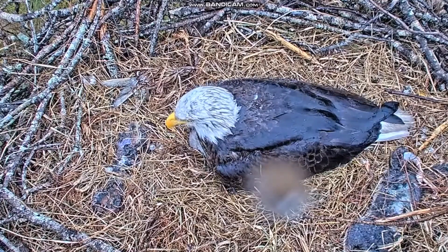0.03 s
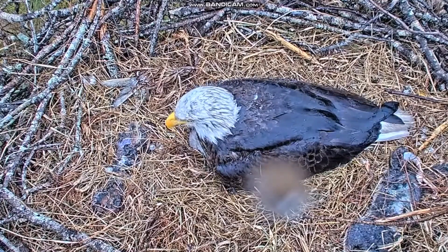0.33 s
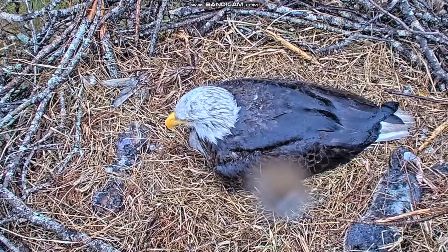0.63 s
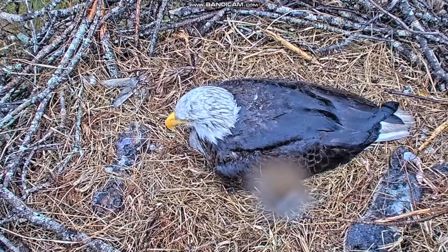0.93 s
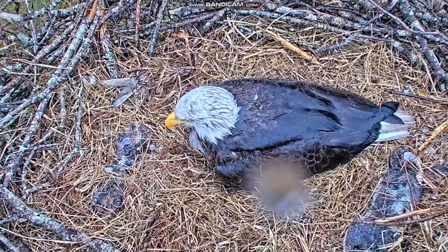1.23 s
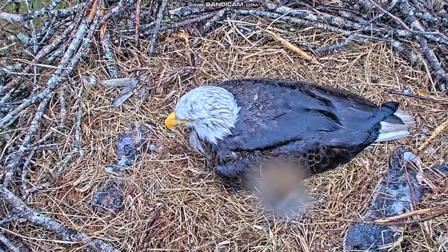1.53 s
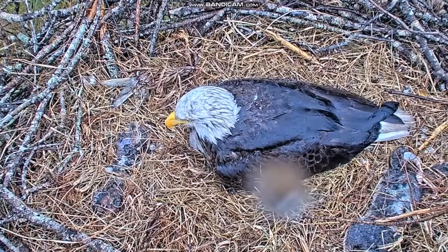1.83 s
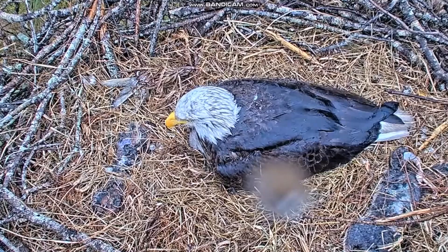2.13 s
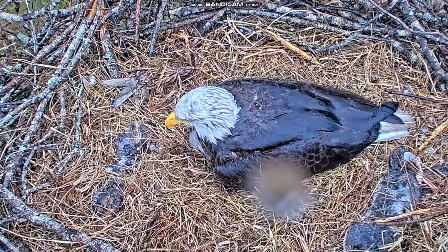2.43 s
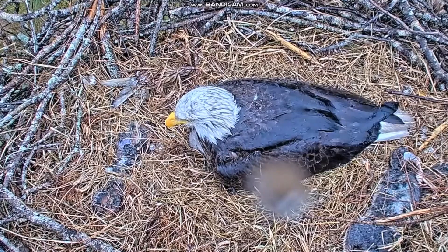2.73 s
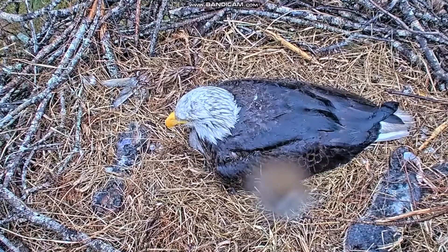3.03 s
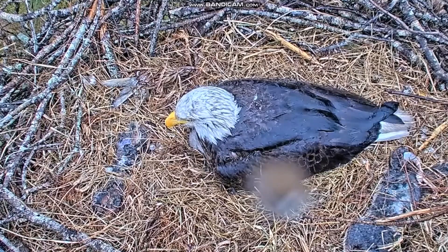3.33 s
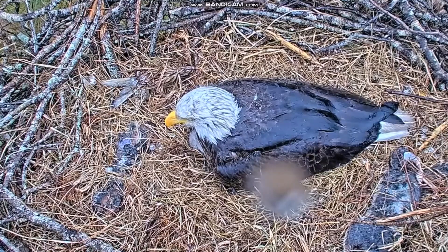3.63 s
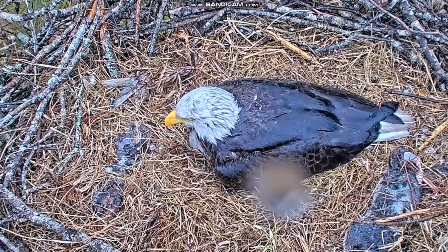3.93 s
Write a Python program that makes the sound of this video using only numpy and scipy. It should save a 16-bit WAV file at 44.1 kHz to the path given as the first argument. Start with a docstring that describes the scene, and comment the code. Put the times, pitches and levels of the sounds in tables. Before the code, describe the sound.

Light rain falls on a stick nest, with dull close taps and a few sharp ticks.

```python
"""At a big stick nest outdoors, light rain falls around a fixed camera.
Fine drops hiss in the straw and trees, over a low rumble and a faint drone. Heavier drops thud
dully on the camera's housing, a few tick sharply on twigs next to the microphone, and drips plink.
Puffs of wind push on the housing. The whole sound stutters once, very briefly."""
import sys
import numpy as np
from scipy import signal
from scipy.fft import rfft, irfft, next_fast_len
from scipy.io import wavfile
from scipy.ndimage import uniform_filter1d, map_coordinates

SR = 44100
rng = np.random.default_rng(int(sys.argv[2]) if len(sys.argv) > 2 else 0)


def output_pcm(signal):
    """Save a mono or channel-first signal as 16-bit PCM at the path in sys.argv[1].

    Samples are clipped to [-1, 1] before scaling.
    """
    pcm = np.clip(np.atleast_2d(signal).T, -1, 1) * 32767
    wavfile.write(sys.argv[1], SR, np.round(pcm).astype(np.int16))


N = 176400

# Levels are relative. A spectrum says how strong each frequency is; t60 is the time to fade by 60 dB.
# How loud the rain is over time: t/s, level/dB
RAIN_LOUDNESS = [(0.0, -47), (0.3, -46), (0.75, -48.5), (1.11, -49.5), (1.44, -47), (2.08, -49.5),
                 (2.32, -48), (2.91, -48), (3.53, -47), (4.0, -47)]
# Spectrum of the rain and its splashes: f/Hz, level/dB
RAIN_SPECTRUM = [(350, -35.5), (600, -22), (773, -16.5), (1070, -1.5), (1640, -0.5), (1970, -6),
                 (2040, -11), (2620, -8.5), (3880, -15), (4510, -15.5), (5240, -21.5), (5680, -28),
                 (7070, -30), (8210, -41.5), (9430, -35), (12300, -77), (20700, -120)]
# Narrow bands where the rain is louder: f/Hz, half width/Hz, boost/dB
RAIN_BOOSTS = [(1638, 200, 3), (2223, 94, 5.5), (2593, 86, 6.5), (2850, 22, 10.5), (3173, 11, 11.5),
               (3473, 36, 7)]
# How much the hiss shimmers: f/Hz, depth/dB
SHIMMER_DEPTH = [(500, 0), (1500, 2), (3000, 3.5), (8000, 5.5)]
# Spectrum of the rumble: f/Hz, level/dB
RUMBLE_SPECTRUM = [(20, 6), (40, -1), (75, -3), (105, -2.5), (140, 3), (210, 1.5), (280, -3.5), (400, -3.5),
                   (520, -14), (750, -21.5), (1200, -57.5)]
# Heavy drops on the housing: t/s, level/dB, base f/Hz, time before fading/s
HEAVY_DROPS = [(.107, -39, 222, 0.0062), (0.245, -28, 184, 0.0051), (0.356, -38, 192, 0.019),
               (0.526, -21, 210, 0.0067), (0.563, -29, 200, 0.011), (0.611, -38, 227, 0.0037),
               (0.71, -37, 189, 0.017), (0.813, -23.5, 215.3, 0.025), (0.901, -24.5, 204, 0.016),
               (0.942, -31.5, 221.6, 0.021), (1.017, -28.5, 209.3, 0.023), (1.066, -23, 166, 0.0039),
               (1.088, -30.5, 219.4, 0.024), (1.108, -19.5, 196, 0.0053), (1.136, -31.5, 183, 0.013),
               (1.15, -26.5, 190, 0.0052), (1.197, -36, 200, 0.034), (1.248, -23, 191, 0.0074),
               (1.332, -27.5, 203, 0.0044), (1.458, -33, 217, 0.011), (1.554, -28, 208, 0.0072),
               (1.624, -28, 175, 0.0064), (1.699, -31.5, 180.7, 0.025), (1.83, -31.5, 174, 0.011),
               (1.849, -27.5, 185, 0.015), (1.874, -24, 201, 0.013), (1.916, -22.5, 180, 0.0033),
               (1.937, -31.5, 203, 0.0092), (1.99, -27.5, 187.7, 0.025), (2.088, -25, 210, 0.0074),
               (2.106, -31.5, 198, 0.022), (2.2, -23, 193, 0.006), (2.243, -29, 203, 0.0097),
               (2.437, -31.5, 202, 0.0078), (2.539, -27, 219, 0.0076), (2.58, -28, 171, 0.012),
               (2.72, -26.5, 193.4, 0.019), (2.907, -27, 193.4, 0.015), (2.989, -27.5, 207, 0.0048),
               (3.12, -34.5, 208, 0.017), (3.14, -25, 213, 0.013), (3.377, -31.5, 184.3, 0.028),
               (3.428, -33.5, 215, 0.011), (3.649, -37, 185, 0.0075), (3.753, -23.5, 200, 0.0053),
               (3.874, -30, 225, 0.0081), (3.918, -33, 208, 0.02)]
# Tones the housing rings with: multiple of base f, level/dB, t60/s
HOUSING_TONES = [(0.679, -23.5, 0.047), (1.004, -1.5, 0.043), (1.299, -10.5, 0.028), (1.62, -13.5, 0.042),
                 (2.251, -17.5, 0.0091)]
# Drops on twigs: t/s, level/dB, treble tilt/(dB per octave), multiple of base f
TWIG_DROPS = [(.127, -22, 2.5, 0.955), (2.5952, -19.5, 2.5, 0.82), (3.2587, -13.5, .5, 0.985),
              (3.8315, -19.5, -1.5, 0.926), (3.854, -22.5, 0, 1.05)]
# Tones a twig rings with: base f/Hz, level/dB, t60/s
TWIG_TONES = [(1026, -8.5, 0.014), (1374, -3.5, 0.0087), (2060, 0.5, 0.0065), (2610, -5.5, 0.006),
              (2950, -9.5, 0.018), (3230, -11.5, 0.018), (3690, -8.5, 0.011), (4370, -6.5, 0.0057),
              (6470, -15, 0.0037), (8820, -31, 0.0076)]
# Drips that ring with one tone: t/s, level/dB, starting f/Hz, t60/s, waver/cycles
DRIP_PLINKS = [(0.7169, -23.5, 2570, 0.028, 0.15), (2.61, -36.5, 1480, 0.27, .22),
               (2.862, -26.5, 1455, 0.034, 0.12)]
# Puffs of wind: peak t/s, half length/s, level/dB
WIND_PUFFS = [(0.852, 0.1, -45), (1.062, 0.042, -40), (1.229, 0.077, -42.5), (1.899, 0.15, -42),
              (2.095, 0.043, -60)]
# Spectrum of wind on the housing: f/Hz, level/dB
WIND_SPECTRUM = [(60, -27.5), (130, -4), (200, 8), (290, -4), (400, -14), (600, -26), (1200, -68.5)]
# Two quick dips in the whole sound: t/s, half length/s, level/dB
STUTTER_DIPS = [(1.1205, .0036, -16), (1.1297, .0028, -20)]

THUD_ATTACK_S = 0.00577


def amp(db):
    """Turn decibels into a number to multiply a sound by."""
    return 10 ** (np.asarray(db) / 20)


def unit(x):
    """Scale a sound so that its average size (rms) is 1."""
    return x / np.sqrt(np.mean(x ** 2) + 1e-20)


def filtered(x, response):
    """Multiply each frequency in x by response(hz)."""
    size = next_fast_len(N + SR // 2)
    return irfft(rfft(x, size) * response(np.fft.rfftfreq(size, 1 / SR)), size)[:N]


def coloured(x, spectrum):
    """Shape x with a spectrum table, then scale it to rms 1."""
    f, db = np.transpose(spectrum)
    return unit(filtered(x, lambda hz: amp(np.interp(np.log(hz + 1), np.log(f + 1), db))))


def wobble(per_s):
    """A smooth curve through per_s random values a second."""
    return map_coordinates(rng.standard_normal(1024), [np.arange(N) * per_s / SR], mode="wrap")


def add(track, s, sound):
    """Mix a sound into the track at s seconds."""
    part = track[max(0, round(s * SR)):][:len(sound)]
    part += sound[:len(part)]


def shimmer(x):
    """Narrow bands of the sound swell and sink at random, most in the treble."""
    hz, _, bands = signal.stft(x, SR, nperseg=1024)
    swell = uniform_filter1d(rng.standard_normal(bands.shape), size=4, axis=0)  # smooth over frequency
    swell = uniform_filter1d(swell, size=7, axis=1)  # and over time
    depth_db = np.interp(hz, *np.transpose(SHIMMER_DEPTH))[:, None]
    gain = amp(depth_db * np.clip(unit(swell), -3, 1.6))
    gain /= np.sqrt(np.mean(gain ** 2, axis=1, keepdims=True))  # each band keeps its average power
    return unit(signal.istft(bands * gain, nperseg=1024)[1][:N])


def rain(droplets_per_s=1100, flutter_below_hz=2620):
    """Far rain merges into a hiss whose lower part flutters; nearer droplets give it a soft grain."""
    hiss = shimmer(coloured(rng.standard_normal(N), RAIN_SPECTRUM))
    hiss *= amp(-0.65 + 1.3 * wobble(per_s=110))
    lows = filtered(hiss, lambda hz: 1 / (1 + (hz / flutter_below_hz) ** 8))
    flutter = unit(amp(np.minimum(3.2 * wobble(per_s=160), 2)))
    hiss = hiss - lows + lows * flutter
    hits = (rng.random(N) < droplets_per_s / SR) * rng.choice([-1, 1], N)
    sizes = amp(6 * np.clip(rng.standard_normal(N), -2, 2))
    droplets = amp(-9) * coloured(hits * sizes, RAIN_SPECTRUM)
    boost = lambda hz: amp(sum(db / (1 + ((hz - f) / width) ** 2) for f, width, db in RAIN_BOOSTS))
    level_db = np.interp(np.arange(N) / SR, *np.transpose(RAIN_LOUDNESS)) + 0.4 * wobble(per_s=9)
    return amp(level_db) * filtered(hiss + droplets, boost)


def rumble_and_drone(drone_hz=342, half_width_hz=32.3):
    """A low outdoor rumble, and a narrow band of noise heard as a faint, fuzzy drone."""
    rumble = coloured(rng.standard_normal(N), RUMBLE_SPECTRUM)
    drone = filtered(rng.standard_normal(N), lambda hz: 1 / (1 + ((hz - drone_hz) / half_width_hz) ** 4))
    return amp(-45) * rumble + amp(-49) * unit(drone)


def thud(base_hz, hold_s):
    """One soft blow makes the housing ring with a few low tones that die quickly."""
    out, t = np.zeros(SR // 8), np.arange(SR // 8) / SR
    rise = np.sin(np.pi / 2 * np.minimum(t / THUD_ATTACK_S, 1)) ** 2
    fading_s = np.maximum(t - hold_s, 0)
    for ratio, db, t60 in HOUSING_TONES:
        extra_db, detune, phase = rng.uniform(-1.035, 1, 3)  # no two blows are alike
        hz = base_hz * ratio * (1 + 0.063 * detune)
        out += amp(db + extra_db - 60 * fading_s / t60) * np.sin(2 * np.pi * (hz * t + phase))
    return rise * out


def drops_on_housing(small_per_s=45):
    """Heavy drops thud on the housing amid a random patter of small ones."""
    out = np.zeros(N)
    for s, db, hz, hold_s in HEAVY_DROPS:
        add(out, s - THUD_ATTACK_S / 2, amp(db - 1.5) * thud(hz, hold_s))
    count = int(small_per_s * N / SR)
    for when, size, pitch in rng.uniform(-1, 1, (count, 3)):
        small_drop = amp(-46 + 7 * size) * thud(base_hz=200.4 * 2 ** (0.4 * pitch), hold_s=0.019)
        add(out, (when + 1) / 2 * N / SR, small_drop)
    return out


def twig_ticks(lag_at_1khz_s=0.00045, splash_t60=0.015):
    """A near drop rings a twig for a few milliseconds and throws a tiny splash."""
    out, t = np.zeros(N), np.arange(SR // 16) / SR
    for s, db, tilt_db, ratio in TWIG_DROPS:
        ring = np.zeros(len(t))
        for k, (base_hz, tone_db, t60) in enumerate(TWIG_TONES):
            hz = base_hz * ratio
            lag_s = lag_at_1khz_s * np.sqrt(1000 / hz)  # high tones travel faster along a bending twig
            age = np.maximum(t - lag_s, 0)
            rise = 1 - np.exp(-age * 2 * hz)
            fade = amp(tone_db + tilt_db * np.log2(hz / 2000) - 60 * age / t60)
            ring += (-1) ** k * rise * fade * np.sin(2 * np.pi * hz * age)
        splash = coloured(rng.standard_normal(N), RAIN_SPECTRUM)[:len(t)]
        splash *= amp(-17 - 60 * t / splash_t60)
        add(out, s, amp(db) * (amp(-7) * ring + splash))
    return out


def drips(attack_s=0.0047, pitch_rise_per_s=0.15):
    """Small wet plinks whose pitch wavers and rises a little as they fade."""
    out, t = np.zeros(N), np.arange(SR // 6) / SR
    rise = 1 - np.exp(-t / attack_s)
    for s, db, hz, t60, waver in DRIP_PLINKS:
        cycles = hz * t * (1 + pitch_rise_per_s * t / 2) + waver * wobble(per_s=240)[:len(t)]
        add(out, s, rise * amp(db - 60 * t / t60) * np.sin(2 * np.pi * cycles))
    return out


def wind():
    """Short puffs of wind push on the housing, each a swell of low noise."""
    t = np.arange(N) / SR
    strength = sum(amp(db) * np.exp(-((t - s) / half_s) ** 2) for s, half_s, db in WIND_PUFFS)
    return strength * coloured(rng.standard_normal(N), WIND_SPECTRUM)


def scene():
    """All the sounds add up at one microphone."""
    return (rain() + rumble_and_drone() + twig_ticks() + drips() + drops_on_housing() + wind())[None]


def record(dry, low_cut_hz=90.5, top_hz=9620):
    """The camera's sound stutters once; its small microphone loses the deep bass and the top treble."""
    t = np.arange(N) / SR
    stutter = amp(sum(db * np.exp(-((t - s) / half_s) ** 4) for s, half_s, db in STUTTER_DIPS))
    low_cut = signal.butter(4, low_cut_hz, "highpass", fs=SR, output="sos")
    thinned = signal.sosfilt(low_cut, stutter * dry)
    return np.array([filtered(channel, lambda hz: hz < top_hz) for channel in thinned])


dry = scene()
out = record(dry)
output_pcm(out)
```